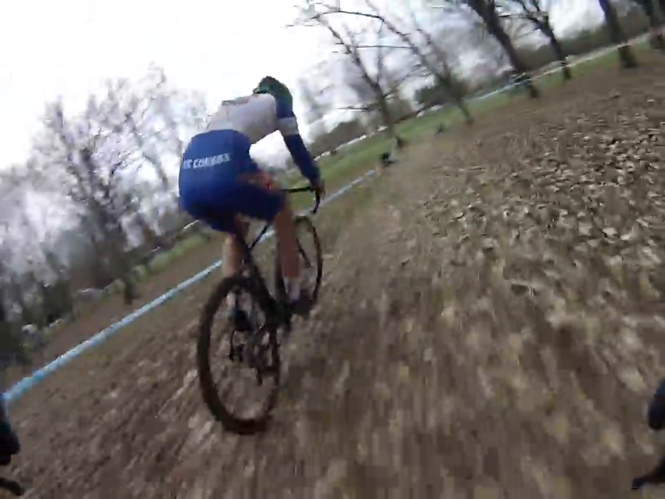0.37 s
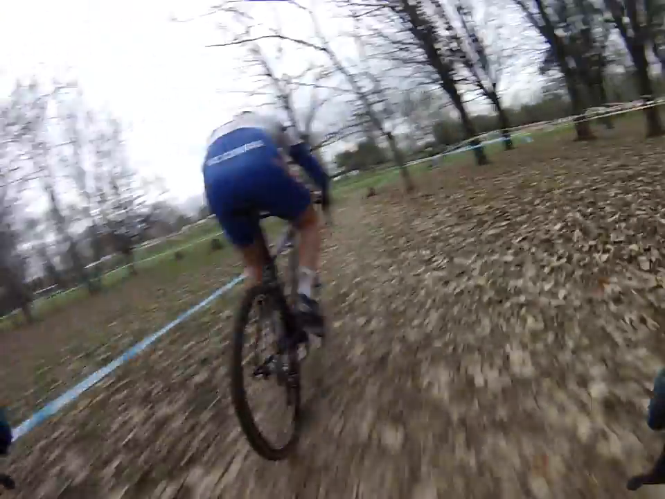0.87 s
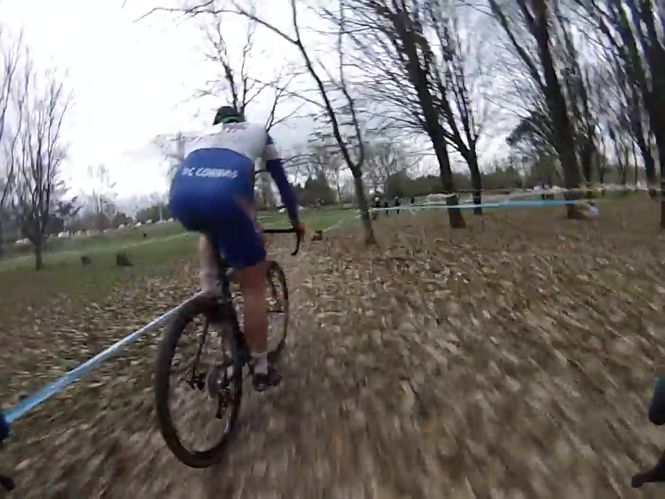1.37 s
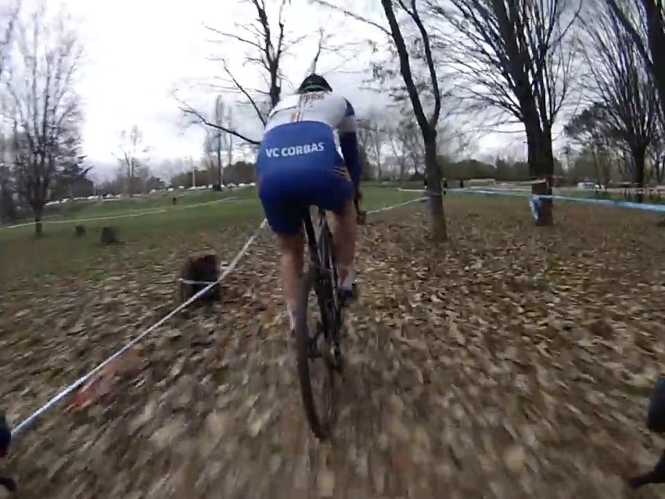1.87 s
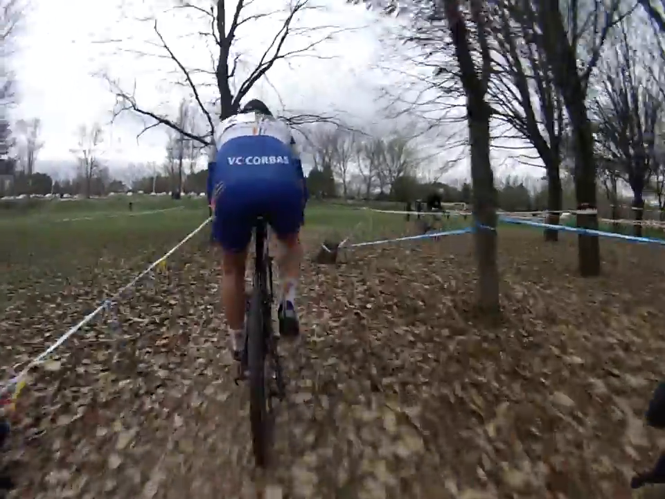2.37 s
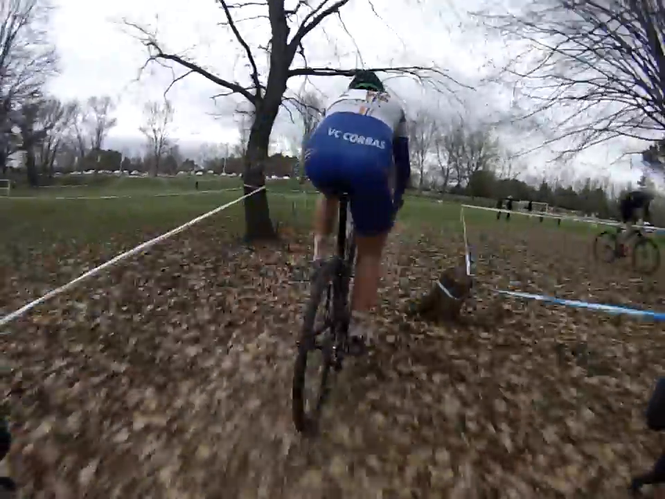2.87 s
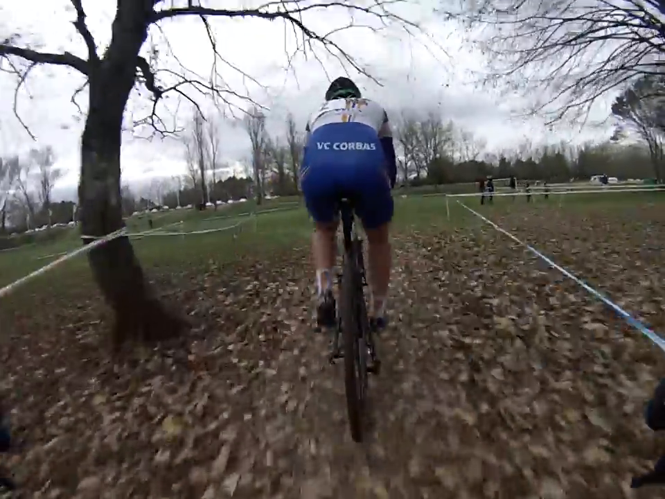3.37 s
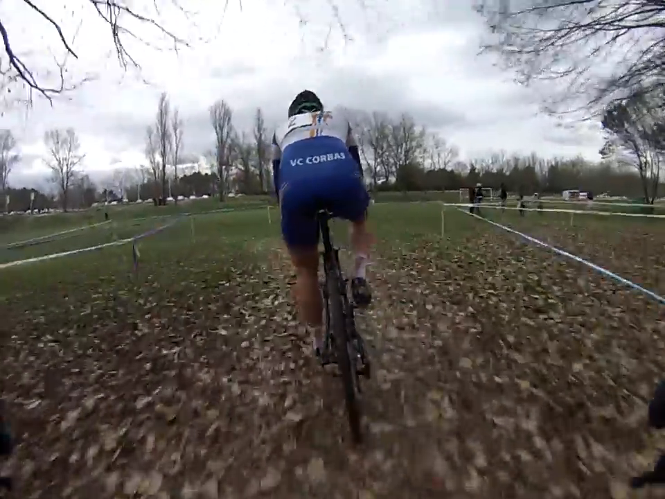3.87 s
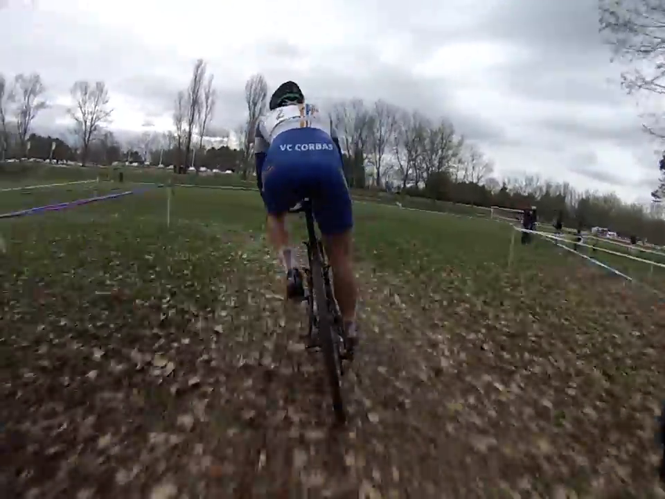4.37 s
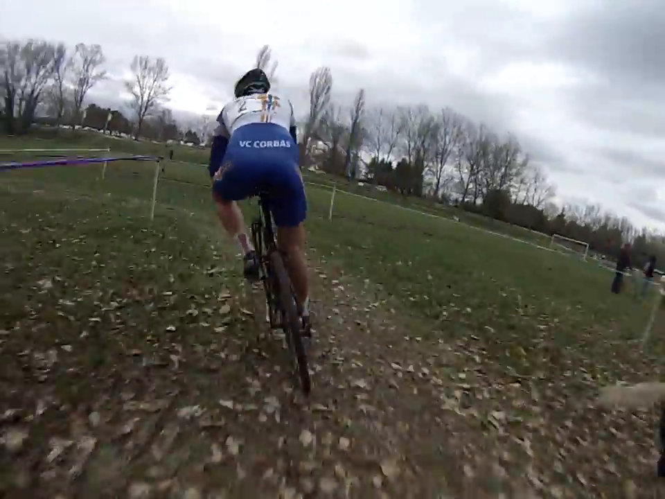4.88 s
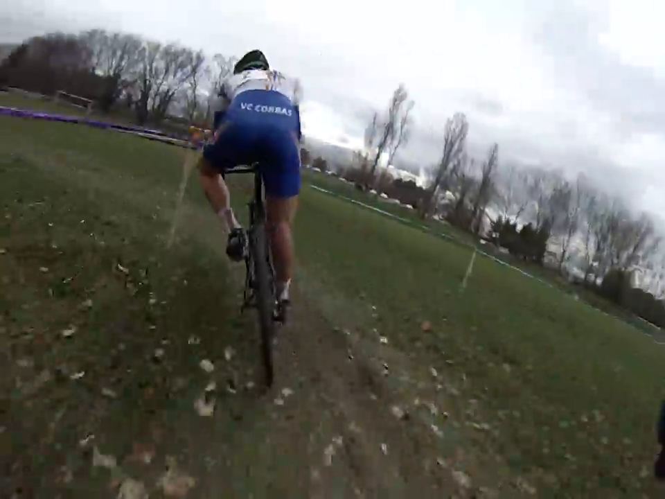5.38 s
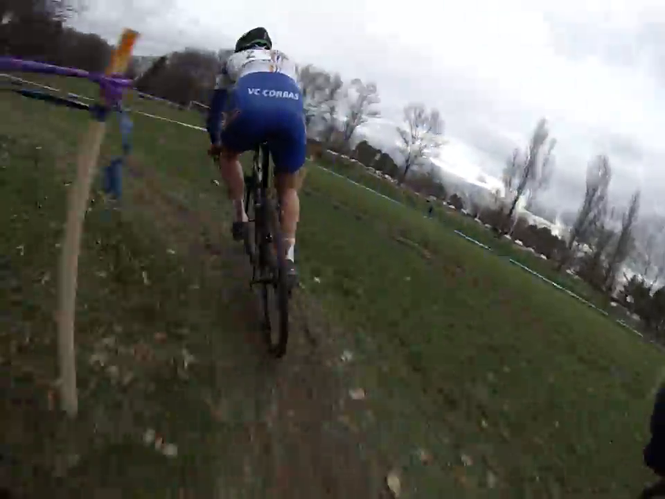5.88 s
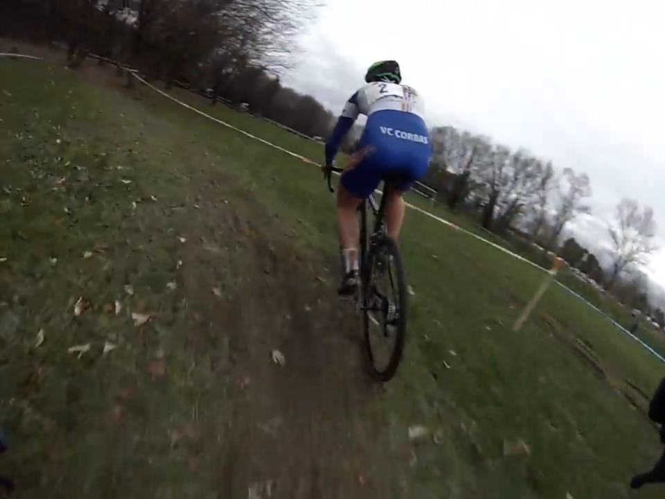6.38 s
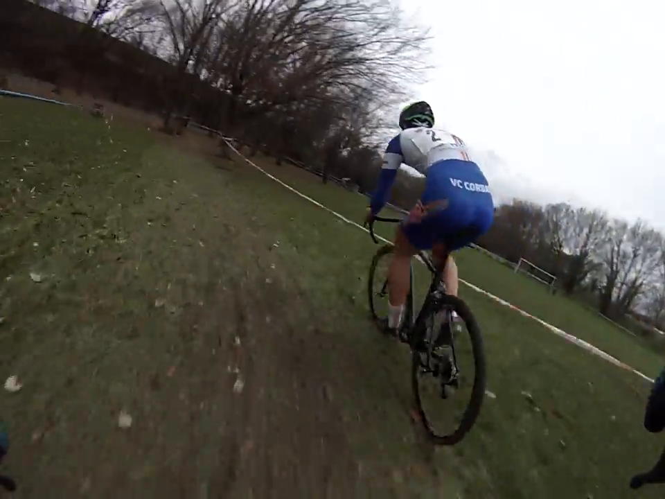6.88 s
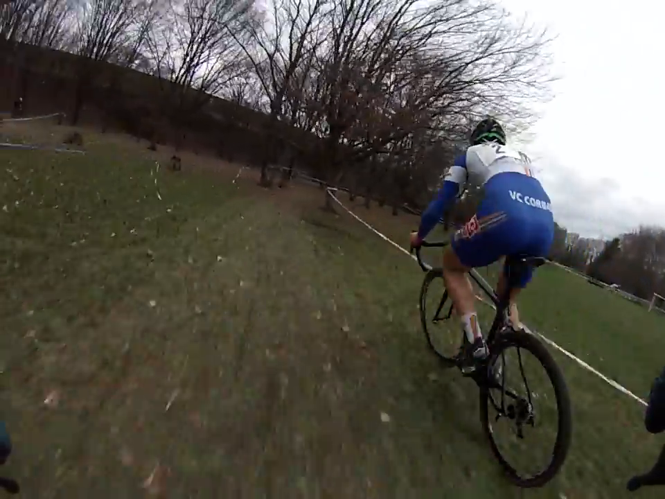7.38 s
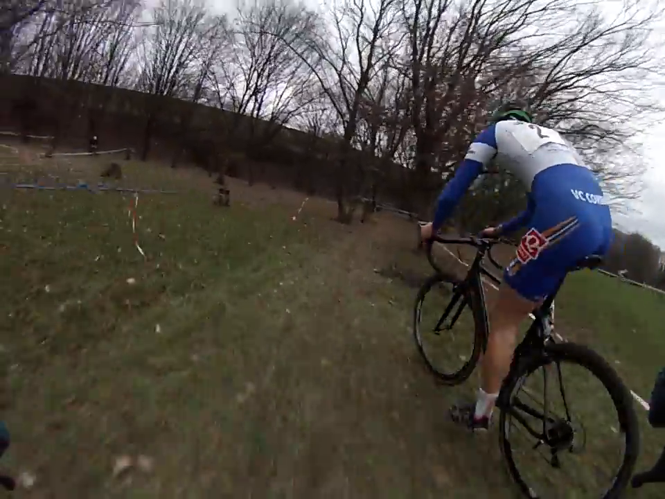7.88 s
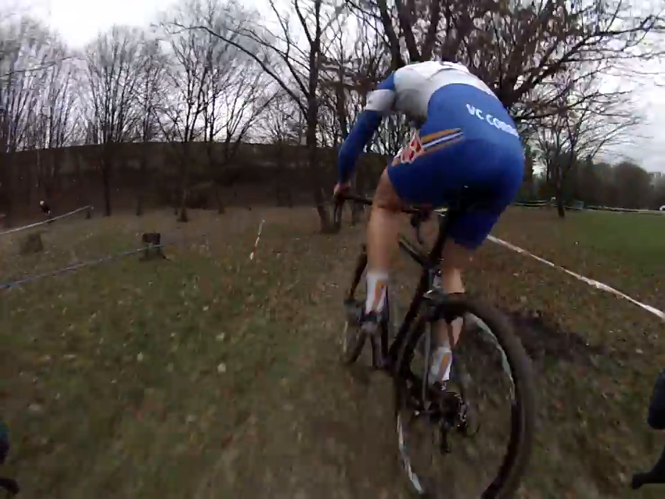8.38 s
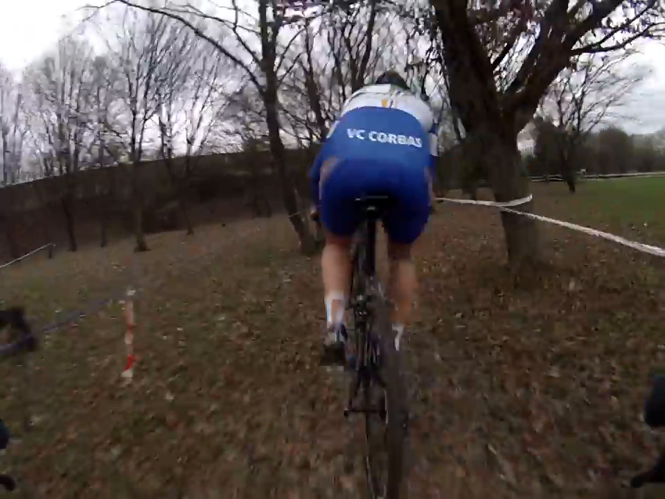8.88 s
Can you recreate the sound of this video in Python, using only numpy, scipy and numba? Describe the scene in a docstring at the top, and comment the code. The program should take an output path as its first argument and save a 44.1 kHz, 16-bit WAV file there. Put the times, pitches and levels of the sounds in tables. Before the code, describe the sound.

A microphone inside a small housing on a bicycle hears a fast ride over bumpy, leafy grass. From the start there is a thick low rumble: a throbbing hum near 107 Hz jolted several times a second, with dull thuds, frame thrum and deep wind buffets. Faint chain and cable rattle chatters beneath. Small dry knocks come in the first second, firmer near 0.9 and 1.7, with a sharp one at 2.3. From 2.4 to 3.8 knocks are sparse over steady shudder. Around 4.2 to 5.9 the bed thins in brief dips, leaving jolts and clustered hollow taps more separate. After 6 the knocks are heavier, notably at 6.3 and 6.6, and the loudest, hard and bright, cracks at 7.5. The rumble continues with scattered clacks and short tube rings to the end at about 9. Everything is close, muffled and bass-heavy, slightly squeezed on big hits.

```python
"""A springy camera mount on a bicycle sways and jolts at every bump of a fast ride over grass: a tone
whose level and phase follow the bumps, with a short throw and a thud at each.
Loose parts knock as bursts of decaying housing modes; frame tubes thrum as resonant noise, and one rings.
Chain and cables rattle as random taps through the housing modes, and wind is low noise that swells and falls.
A gain control steps down on the big swings, and each step is a tiny tick."""
import sys
import numpy as np
from scipy import signal
from scipy.io import wavfile
from scipy.ndimage import uniform_filter1d
from numba import njit

SR = 44100
rng = np.random.default_rng(int(sys.argv[2]) if len(sys.argv) > 2 else 0)


def linear_from_db(decibels):
    """Turn decibels (scalar or array-like) into linear amplitude factors; 0 gives 1."""
    return 10 ** (np.asarray(decibels, float) / 20)


def generate_wav(sig):
    """Save sig (samples, or channels by samples) to the path in sys.argv[1] as 16-bit PCM at SR."""
    pcm = np.round(np.clip(np.atleast_2d(sig).T, -1, 1) * 32767).astype(np.int16)
    wavfile.write(sys.argv[1], SR, pcm)


N = 396459
SECONDS = np.arange(N) / SR


def resonate(x, hz, width_hz):
    """Two-pole band-pass, gain 1 at the centre."""
    return signal.lfilter(*signal.iirpeak(hz, hz / width_hz, fs=SR), x)


def band(x, low_hz, high_hz):
    """Steep band-pass."""
    return signal.sosfilt(signal.butter(3, [low_hz, high_hz], "band", fs=SR, output="sos"), x)


def unit(x):
    """Scale to rms 1."""
    return x / np.sqrt(np.mean(x ** 2))


def decay(t, t60_s):
    """Exponential fade that loses 60 dB in t60_s."""
    return np.exp(-np.log(1000) * t / t60_s)


def bell(t, width_s):
    """Gaussian bump of height 1."""
    return np.exp(-.5 * (t / width_s) ** 2)


def walk(rate_hz):
    """Random levels held 1 / rate_hz seconds and smoothed twice; spread near 1."""
    hold = int(SR / rate_hz)
    levels = np.repeat(rng.standard_normal(N // hold + 1), hold)
    return 1.8 * uniform_filter1d(uniform_filter1d(levels, hold), hold)[:N]


def add(track, sound, start_s):
    """Mix a short sound in at a time, trimmed to the track."""
    i = int(start_s * SR)
    track[max(i, 0):i + len(sound)] += sound[max(-i, 0):N - i]


def power_sum(*levels_db):
    """Level of unrelated sounds together, in dB."""
    return 10 * np.log10(sum(linear_from_db(db) ** 2 for db in levels_db))


# How rough the ground feels, joined by straight lines, before dips and sway move it.
# Each row: time in seconds, rattle level in dB, frame thrum level in dB.
ROLL = [(0.0, -42, -24.5), (0.4, -48, -33.5), (0.7, -45.5, -34), (1.15, -44, -29.5), (1.68, -46, -36),
        (2.13, -41, -31), (2.45, -47, -33.5), (2.93, -43, -34.5), (3.15, -49.5, -35), (3.36, -46.5, -30.5),
        (3.7, -40, -27), (4.38, -43.5, -33.5), (4.81, -49.5, -41), (5.48, -45.5, -39), (5.91, -40.5, -36),
        (6.03, -46.5, -39), (6.28, -48, -36), (6.48, -42, -29.5), (6.91, -43.5, -30.5),
        (7.24, -46.5, -34.5), (7.99, -45, -32.5), (8.99, -44, -31.5)]


def roll_levels():
    """Rougher ground drives both the loose parts and the frame harder."""
    s, rattle_db, thrum_db = np.transpose(ROLL)
    return np.interp(SECONDS, s, rattle_db), np.interp(SECONDS, s, thrum_db)


# Brief dips in the level of rattle and thrum.
# Each row: middle in seconds, length in seconds, depth in dB (negative swells instead).
DIPS = [(0.399, 0.049, 4), (0.819, 0.033, 5.5), (1.634, 0.031, -0.5), (2.376, .04, 3), (3.009, 0.054, 4),
        (3.195, .07, 1.5), (3.39, 0.038, 5), (4.288, 0.059, 5.5), (4.52, .03, 11), (4.707, .1, 11),
        (4.893, 0.052, 7), (5.1, .045, 7.5), (5.254, .08, 6.5), (5.556, 0.11, 10.5), (5.864, 0.059, 14),
        (6.167, 0.11, 7), (6.702, .05, 5.5), (7.234, .1, 6), (7.526, 0.057, 8.5)]


def dip_level():
    """Smooth level curve in dB, with a bell-shaped fall and recovery at each dip."""
    return -sum(db * np.exp(-(2 * (SECONDS - s) / length_s) ** 2) for s, length_s, db in DIPS)


# Level of the low wind noise, as overlapping swells. Each row: peak time in seconds, level in dB.
WIND_SWELLS = [(0.042, -19), (0.26, -26), (0.47, -21), (0.641, -26), (0.912, -17.5), (1.291, -16.5),
               (1.601, -28.5), (1.73, -17.5), (2.14, -14.5), (2.329, -19.5), (2.5, -21.5), (2.672, -16),
               (2.88, -17), (3.092, -19), (3.511, -21), (3.72, -16.5), (3.942, -15.5), (4.08, -21.5),
               (4.251, -16), (4.391, -17.5), (4.798, -22), (5.052, -23.5), (5.458, -20.5), (5.631, -19.5),
               (5.771, -15.5), (6.0, -20), (6.319, -20), (6.571, -22.5), (6.878, -17), (7.17, -19.5),
               (7.39, -23), (7.6, -25.5), (7.808, -25), (7.942, -19.5), (8.1, -19.5), (8.27, -17),
               (8.45, -17.5), (8.74, -19.5), (8.87, -18)]
SWELL_S, BREEZE_OVER_THRUM_DB = 0.05, 5.5


def wind_level(thrum_db):
    """Overlapping swells of level over a breeze that grows as the ride gets rougher."""
    power = np.zeros(N)
    t = np.arange(-.25, .25, 1 / SR)
    for s, db in WIND_SWELLS:
        add(power, linear_from_db(db) ** 2 * np.exp(-(t / SWELL_S) ** 2), s + t[0])
    return power_sum(10 * np.log10(power + 1e-12), thrum_db + BREEZE_OVER_THRUM_DB)


def wind(wind_db):
    """Slow wind pressure on the housing: low noise, its swings evened out a little by the small port."""
    pressure = unit(band(rng.standard_normal(N), 6.8, 51))
    evened = np.tanh(0.87 * pressure)
    return linear_from_db(wind_db) * unit(band(evened, 12, 90))


# Resonant modes of the housing, which colour both rattle and knocks.
# Each row: frequency in Hz, bandwidth in Hz (of the narrower of two passes), weight in dB.
HOUSING = [(414, 150, 5.5), (565, 230, 4), (700, 110, 3), (891, 230, 5), (1203, 190, -4.5), (1400, 71, 3),
           (1596, 170, 1), (1885, 67, 1), (2063, 65, -2), (2950, 200, -25.5), (3130, 520, -30),
           (3600, 190, -21.5), (3710, 100, -24), (4930, 460, -34), (6960, 300, -41)]
RATTLE_PER_SWAY_DB, RATTLE_DIP_SHARE = 0.05, 0.94  # dB for each dB of sway; share of each dip


def rattle(rattle_db):
    """Chain and cables chatter: dense taps of scattered size; each housing mode hears shared taps and its own."""
    chance = rng.random((2, N))
    struck = chance[0] < 500 / SR  # about 500 taps a second
    size = linear_from_db(-5.0 * np.log(chance[1] + 0.0041))
    taps = struck * size * np.sign(rng.standard_normal(N))
    taps = unit(taps) + 0.25 * rng.standard_normal(N)
    bunches_db = 2.0 * walk(60)
    rung = 0
    for (hz, width_hz, db), elsewhere in zip(HOUSING, rng.integers(SR, N - SR, len(HOUSING))):
        own_taps = np.roll(taps, elsewhere)
        heard = (taps + 1.2 * own_taps) * linear_from_db(db + bunches_db + 1.8 * walk(30))
        rung = rung + resonate(resonate(heard, hz, width_hz), hz, 3 * width_hz)
    return linear_from_db(rattle_db) * unit(rung)


# Resonant modes of the frame tubes.
# Each row: frequency in Hz, bandwidth in Hz (of the narrower of two passes), weight in dB.
FRAME = [(79, 26, 0), (169, 72, 0.5), (214.6, 32, -2.5), (286.5, 36, -1)]
THRUM_PER_SWAY_DB = 0.13  # dB for each dB of sway


def frame(thrum_db):
    """Tubes of the frame thrum: noise through each mode, every mode wavering on its own."""
    thrum = 0
    for hz, width_hz, db in FRAME:
        waver = linear_from_db(db + 2.6 * walk(30))
        mode = resonate(resonate(rng.standard_normal(N), hz, width_hz), hz, 1.2 * width_hz)
        thrum = thrum + waver * mode
    return linear_from_db(thrum_db) * unit(thrum)


# A frame tube rings near 286 Hz, mostly along with a knock or bump.
# Each row: start in seconds, peak level in dB.
TUBE_RINGS = [(.06, -18), (.959, -19.5), (1.687, -24), (2.258, -24), (3.906, -26.5), (4.585, -27.5),
              (4.83, -28.5), (5.162, -28.5), (6.316, -23), (6.615, -21), (7.155, -23), (7.489, -22.5),
              (8.161, -22.5), (8.624, -25), (8.934, -21)]
TUBE_RISE_S, TUBE_T60_S = .006, .14


def tube():
    """A quick swell and a short ring of the highest frame mode."""
    out, t = np.zeros(N), np.arange(0, .25, 1 / SR)
    shape = (1 - np.exp(-t / TUBE_RISE_S)) * decay(t, TUBE_T60_S)
    shape = shape / shape.max()
    for (s, db), turn in zip(TUBE_RINGS, rng.random(len(TUBE_RINGS))):
        add(out, linear_from_db(db) * shape * np.sin(2 * np.pi * (FRAME[-1][0] * t + turn)), s)
    return out


# Knocks of loose parts. Each row: start in seconds, peak level of the body in dB, strike centre in Hz,
# ring time (to -60 dB) in seconds, snap level in dB relative to the body.
KNOCKS = [(.063,-25,677,0.013,-40),(.146,-30,1530,.014,-13),(.183,-26.5,1740,0.018,-28),(.292,-24,1850,0.0099,-49),(.448,-30,910,.03,-39),(.553,-30.5,1400,0.016,-15),(.796,-28.5,1820,0.013,-32.5),(.875,-20.5,1630,0.014,-40.5),(.938,-20,900,.024,-19.5),(1.597,-22,1850,0.009,-31.5),(1.68,-17.5,980,0.023,-23),(2.049,-28,900,0.045,-30.5),(2.257,-12.5,1583,0.015,-33),(2.391,-26,1400,.017,-14.5),(2.602,-30.5,804,.03,-35),(3.12,-21,1400,0.017,-18),(3.88,-26,1400,.03,-37),(4.016,-26.5,935,0.015,-28.5),(4.21,-25,985,.025,-34),(4.335,-20.5,1860,0.012,-25.5),(4.476,-26,982,.015,-10.5),(4.545,-25.5,688,.015,-24.5),(4.577,-26.5,970,0.018,-24),(4.801,-31,628,0.013,-15),(5.045,-27,647,0.014,-10),(5.134,-31,692,.028,-28),(5.16,-22,1300,0.014,-39),(5.348,-35,910,.028,-23.5),(5.405,-24,625,0.026,-21.5),(5.475,-17.5,660,0.013,-17),(5.503,-37.5,700,0.023,-45),(5.732,-27,1920,0.024,-23),(5.896,-31,665,0.027,-30),(6.007,-28,700,0.032,-23),(6.042,-18.5,1190,0.03,-29),(6.086,-20.5,696,0.018,-18.5),(6.246,-33,880,0.021,-29),(6.311,-16,990,0.025,-40),(6.315,-14,580,0.039,-40),(6.385,-26.5,951,0.028,-18),(6.616,-14,886,.028,-28.5),(6.749,-23.5,690,.028,-40),(6.847,-27.5,905,0.026,-32),(6.924,-27,960,.018,-12),(7.151,-22.5,790,.027,-21.5),(7.391,-24.5,1710,0.015,-37),(7.487,-8,1870,.018,-35),(7.544,-27.5,675,0.029,-34.5),(7.93,-21.5,970,.04,-19),(8.159,-19.5,1820,.016,-36.5),(8.27,-24,1460,0.016,-35),(8.608,-24,952,.02,-31.5),(8.694,-20,660,0.018,-14.5),(8.932,-20.5,640,0.019,-24),(8.965,-25.5,760,0.011,-21)]
CONTACT_S = 0.00051
MODES_BELOW_DB, MODES_ABOVE_DB = -14, -9.5  # least share of modes far from the strike centre


def knocks():
    """Each knock is a few quick contacts and a rebound that ring the housing modes nearest its strike centre."""
    out, t = np.zeros(N), np.arange(0, .08, 1 / SR)
    hz, _, mode_db = np.transpose(HOUSING)[:, :, None]
    chances = rng.random((len(KNOCKS), 3, len(HOUSING), 1))
    grits = rng.standard_normal((len(KNOCKS), len(t)))
    for (s, db, centre_hz, ring_s, snap_db), chance, grit in zip(KNOCKS, chances, grits):
        floor_db = np.where(hz < centre_hz, MODES_BELOW_DB, MODES_ABOVE_DB)
        near_db = np.maximum(-45 * np.abs(np.log2(hz / centre_hz)), floor_db)
        contact_s = 0.0037 * chance[0]
        rebound_s = .006 + 0.012 * chance[2]
        knock = 0
        # each mode is struck at its own moment, with its own sign
        for delay_s, size in (contact_s, 1), (rebound_s, .2):
            since = np.maximum(t - delay_s, 0)
            onset = 1 - np.exp(-since / CONTACT_S)
            modes = linear_from_db(mode_db + near_db) * np.sin(2 * np.pi * hz * since) * onset
            modes = modes * decay(since, max(ring_s, .005))
            knock = knock + size * (modes * np.sign(chance[1] - .5)).sum(axis=0)
        # hard edges add a dry snap of treble noise
        snap = band(grit * np.exp(-t / 0.0053), 1800, 5500)
        knock = band(knock, 270, 5800)
        add(out, linear_from_db(db) * (knock / np.abs(knock).max() + linear_from_db(snap_db) * snap / np.abs(snap).max()), s)
    return out


# Bumps in the ground. Each row: peak in seconds, throw as a signed size, level of the sway it sets off in dB,
# full sway before the peak in seconds, full sway after the peak in seconds.
BUMPS = [(0.0288, -0.1, -13.5, 0.019, 0.011), (0.1218, -0.48, -17, 0.0046, 0.0067),
         (0.1912, 0.36, -19, 0.028, 0.012), (0.2425, 0.16, -19.5, 0.0087, 0.037),
         (0.3193, -0.076, -11.5, 0.008, 0.022), (0.4068, -0.11, -21, 0.0072, 0.0094),
         (0.4912, -0.56, -13.5, 0.017, 0.0096), (0.5629, -0.09, -14.5, 0.016, 0.016),
         (0.6664, -0.08, -16.5, 0.018, 0.027), (0.7379, 0.14, -13, 0.004, 0.032),
         (0.885, 0.54, -18, 0.025, 0.015), (0.9687, -0.25, -15.5, 0.0077, 0.032),
         (1.0489, 0.016, -12, 0.04, 0.013), (1.168, -0.08, -14.5, 0.027, 0.013),
         (1.2203, 0.1, -17, 0.0039, 0.01), (1.3025, -0.11, -18.5, 0.01, 0.021),
         (1.3674, 0.36, -13, 0.006, 0.012), (1.4465, -0.11, -11.5, 0.029, 0.064),
         (1.5846, -0.14, -16.5, 0.014, 0.025), (1.6933, -0.12, -22.5, 0.0055, 0.015),
         (1.7973, -0.16, -12, 0.0065, 0.014), (1.8705, -0.0034, -15, 0.03, 0.018),
         (1.9765, -0.12, -15.5, 0.025, 0.0099), (2.0994, 0.49, -17.5, 0.054, 0.016),
         (2.1265, -0.39, -10, 0.0054, 0.016), (2.264, 0.75, -19.5, 0.02, 0.016),
         (2.319, -0.14, -13, 0.01, 0.013), (2.4231, -0.08, -16, 0.0083, 0.013),
         (2.521, -0.051, -16, 0.039, 0.044), (2.6227, 0.12, -15, 0.025, 0.004),
         (2.6589, 0.2, -15.5, 0.01, 0.022), (2.742, -0.09, -12.5, 0.012, 0.0079),
         (2.8359, -0.12, -19, 0.022, 0.021), (2.9315, -0.23, -11.5, 0.0059, 0.014),
         (3.061, 0.1, -14.5, 0.011, 0.03), (3.1396, -0.52, -9, 0.011, 0.006),
         (3.2907, -0.0042, -26.5, 0.013, 0.036), (3.4858, -0.14, -14, 0.016, 0.0054),
         (3.5806, 0.28, -13.5, 0.0037, 0.049), (3.6548, 0.14, -15, 0.0077, 0.008),
         (3.7034, -0.2, -20.5, 0.0076, 0.01), (3.8284, 0.19, -15.5, 0.0064, 0.013),
         (3.8615, -0.22, -16.5, 0.011, 0.012), (3.9965, -0.17, -14, 0.027, 0.034),
         (4.059, -0.3, -18, 0.013, 0.043), (4.2154, -0.45, -19.5, 0.019, 0.004),
         (4.2694, 0.16, -12.5, 0.012, 0.006), (4.3422, 0.3, -21, 0.005, 0.0062),
         (4.3912, 0.16, -18, 0.0083, 0.015), (4.4848, 0.28, -13, 0.0056, 0.008),
         (4.5551, -0.56, -14, 0.005, 0.009), (4.5896, -0.25, -11.5, 0.005, 0.017),
         (4.6566, -0.097, -16, 0.004, 0.01), (4.7778, 0.097, -15.5, 0.004, 0.012),
         (4.8101, -0.43, -11.5, 0.007, 0.031), (4.9261, -0.09, -17.5, 0.0029, 0.01),
         (5.055, -0.38, -11.5, 0.008, 0.0093), (5.1416, -0.34, -14, 0.0036, 0.0071),
         (5.1694, 0.25, -14.5, 0.0041, 0.025), (5.2861, -0.032, -24.5, 0.007, 0.023),
         (5.3804, 0.2, -13.5, 0.01, 0.011), (5.4151, -0.23, -15, 0.0089, 0.013),
         (5.4779, -0.36, -12, 0.0035, 0.0081), (5.621, -0.058, -22.5, 0.025, 0.006),
         (5.7772, -0.19, -19.5, 0.005, 0.013), (5.818, -0.44, -12.5, 0.0058, 0.0063),
         (5.9021, -0.1, -16, 0.0044, 0.0061), (6.0493, 0.2, -13, 0.02, 0.009),
         (6.094, -0.75, -10.5, 0.0057, 0.0079), (6.3195, 0.27, -16, 0.01, 0.02),
         (6.422, -0.1, -13.5, 0.0088, 0.007), (6.5383, -0.15, -13.5, 0.005, 0.0097),
         (6.6216, -0.36, -17, 0.0037, 0.066), (6.6438, -0.25, -14, 0.0046, 0.017),
         (6.7998, 0.09, -13, 0.0084, 0.008), (6.8547, -0.08, -18, 0.013, 0.007),
         (6.9311, -0.057, -11, 0.016, 0.0081), (7.076, -0.21, -13.5, 0.0077, 0.009),
         (7.1697, -0.46, -15, 0.0088, 0.0062), (7.2727, 0.051, -14.5, 0.036, 0.036),
         (7.4177, -0.09, -16.5, 0.033, 0.0099), (7.4937, 1.2, -19, 0.0077, 0.005),
         (7.6179, -0.37, -13.5, 0.0082, 0.05), (7.748, 0.033, -16.5, 0.02, 0.01),
         (7.7871, 0.08, -13.5, 0.019, 0.011), (7.899, -0.1, -17.5, 0.012, 0.007),
         (7.9635, -0.12, -12.5, 0.0046, 0.012), (8.056, -0.08, -18, 0.0063, 0.036),
         (8.0893, -0.2, -14, 0.01, 0.033), (8.1663, -0.62, -20.5, 0.04, 0.005),
         (8.2774, 0.45, -15.5, 0.008, 0.011), (8.3239, -0.24, -12, 0.003, 0.0091),
         (8.4159, 0.1, -18, 0.02, 0.02), (8.493, 0.15, -11.5, 0.021, 0.03),
         (8.6278, 0.37, -16, 0.038, 0.016), (8.7312, 0.11, -13, 0.008, 0.0072),
         (8.8064, 0.014, -20, 0.008, 0.024), (8.94, -0.66, -11, 0.016, 0.0053)]
SWAY_RISE_DB_S, SWAY_FADE_DB_S, SWAY_OVER_THRUM_DB = 604.5, 334, 5.5
MOUNT_HZ, THUD_T60_S, THUD_SHARE = 107.34, 0.16, 0.18
THROW_S, THROW_HZ = 0.0017, 150.3


def sway_level(thrum_db):
    """Each bump winds the sway up, holds it and lets it die; rough ground keeps a little going."""
    power = np.zeros(N)
    t = np.arange(-.2, .4, 1 / SR)
    for s, _, db, before_s, after_s in BUMPS:
        rise_db = SWAY_RISE_DB_S * np.minimum(t + before_s, 0)
        fade_db = SWAY_FADE_DB_S * np.maximum(t - after_s, 0)
        add(power, linear_from_db(db + rise_db - fade_db) ** 2, s + t[0])
    return power_sum(10 * np.log10(power + 1e-12), thrum_db + SWAY_OVER_THRUM_DB)


def mount(sway_db):
    """The mount sways on its spring; each bump throws it one way, at a crest of the sway, and thuds into the frame."""
    lead_s = .03
    t = np.arange(-lead_s, .2, 1 / SR)
    throw = bell(t, THROW_S) * np.cos(2 * np.pi * THROW_HZ * t)
    fade = np.where(t < 0, np.exp(t / 0.0099), decay(t, THUD_T60_S))
    thud = fade * sum(linear_from_db(db) * np.cos(2 * np.pi * hz * t) for hz, _, db in FRAME[1:]) / 3
    bumps, grip = np.zeros(N), np.zeros(N)
    for s, swing, *_ in BUMPS:
        add(bumps, swing * (throw + THUD_SHARE * thud), s - lead_s)
        add(grip, bell(t, 0.01), s - lead_s)
    # whole turns between bumps of one direction, an extra half turn between opposite ones
    s, swing = np.transpose(BUMPS)[:2]
    s = np.r_[-1, s, N / SR + 1]
    half = np.r_[0, swing < 0, 0] / 2
    whole = np.round(MOUNT_HZ * np.diff(s, prepend=-1) - np.diff(half, prepend=0))
    turns = np.cumsum(whole) + half
    # between bumps the ground pushes the sway early or late
    drift = 0.19 * walk(20) * (1 - np.minimum(grip, 1))
    sway = np.sqrt(2) * np.cos(2 * np.pi * (np.interp(SECONDS, s, turns) + drift))
    return bumps + band(linear_from_db(sway_db + 1.2 * walk(40)) * sway, 26, 520)


def scene():
    """All of it reaches the microphone through the housing; a strong sway shakes frame and chain harder."""
    rattle_db, thrum_db = roll_levels()
    dip_db = dip_level()
    thrum_db = thrum_db + dip_db
    rattle_db = rattle_db + RATTLE_DIP_SHARE * dip_db
    sway_db = sway_level(thrum_db)
    shake_db = sway_db - sway_db.mean()
    mix = mount(sway_db)
    mix = mix + frame(thrum_db + THRUM_PER_SWAY_DB * shake_db)
    mix = mix + wind(wind_level(thrum_db))
    mix = mix + rattle(rattle_db + RATTLE_PER_SWAY_DB * shake_db)
    return (mix + knocks() + tube())[None]


@njit
def stepped_gain(x, top, ratio, attack, release, step_db):
    """Gain that falls in small sudden steps while the sound is over the top and creeps back smoothly."""
    y, envelope, gain_db = np.empty(len(x)), top, 0.
    for i in range(len(x)):
        # attack and release: share of the gap closed each sample
        envelope += (abs(x[i]) - envelope) * (attack if abs(x[i]) > envelope else release)
        want_db = min(0., 20 * np.log10(top / envelope) * (1 - 1 / ratio))
        if want_db < gain_db - step_db:
            gain_db -= step_db
        elif want_db > gain_db:
            gain_db = want_db
        y[i] = x[i] * 10 ** (gain_db / 20)
    return y


def top_cut(x):
    """Nothing passes above the cut-off."""
    return signal.sosfilt(signal.butter(12, 15800, fs=SR, output="sos"), x)


def record(dry):
    """Faint circuit hiss, stepped gain control, a dull converter, then a hard ceiling."""
    hiss = linear_from_db(-97) * resonate(rng.standard_normal(N), 3000, 5000)
    held = stepped_gain(dry[0] + hiss, 0.2, 1.5, 0.0074, 0.00037, 0.31)
    dull = signal.sosfilt(signal.butter(2, 8000, fs=SR, output="sos"), held)
    mix = np.clip(linear_from_db(0.51) * dull, -1, 1)[None]
    return top_cut(mix)


dry = scene()
out = record(dry)
generate_wav(out)
```